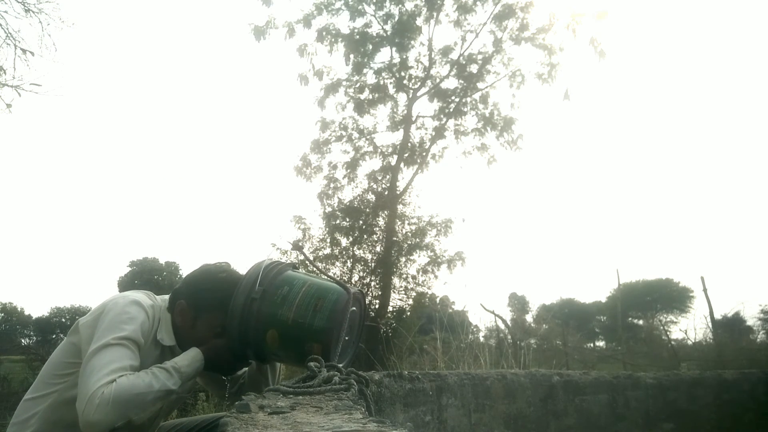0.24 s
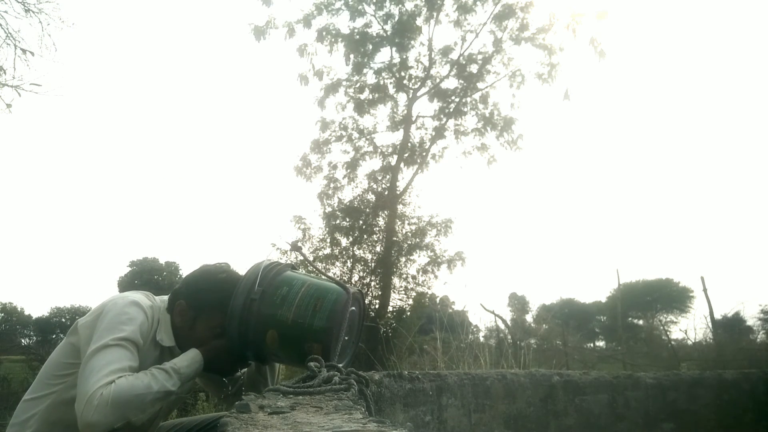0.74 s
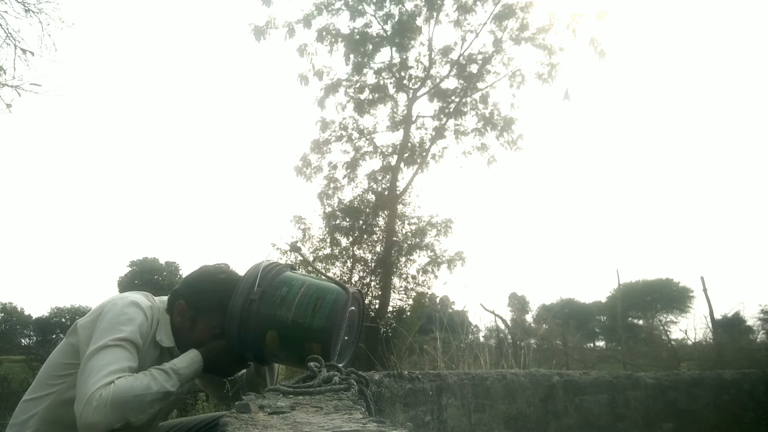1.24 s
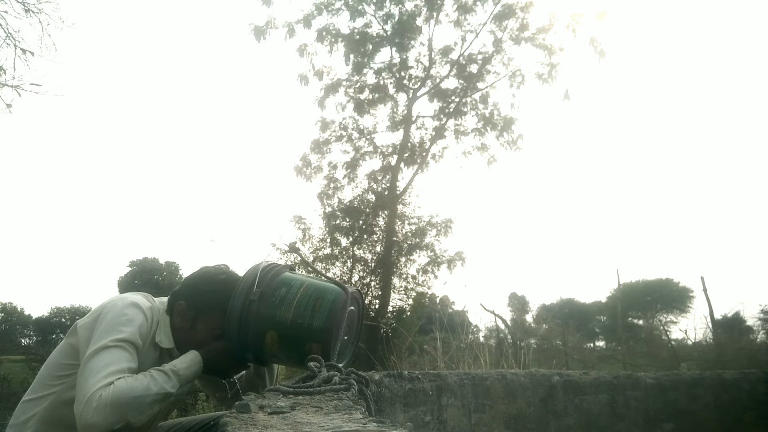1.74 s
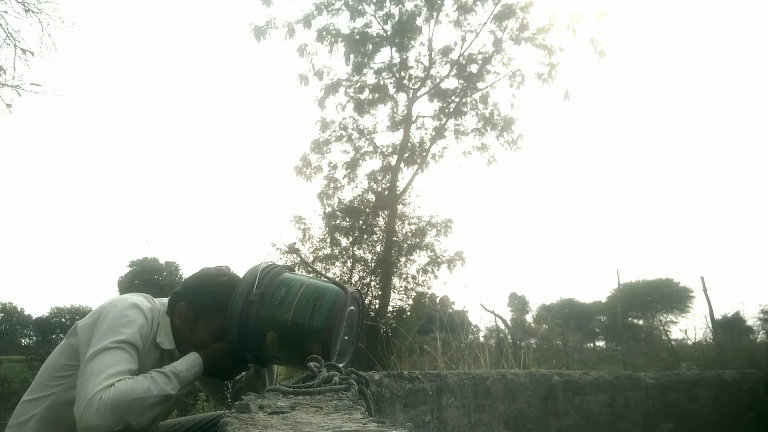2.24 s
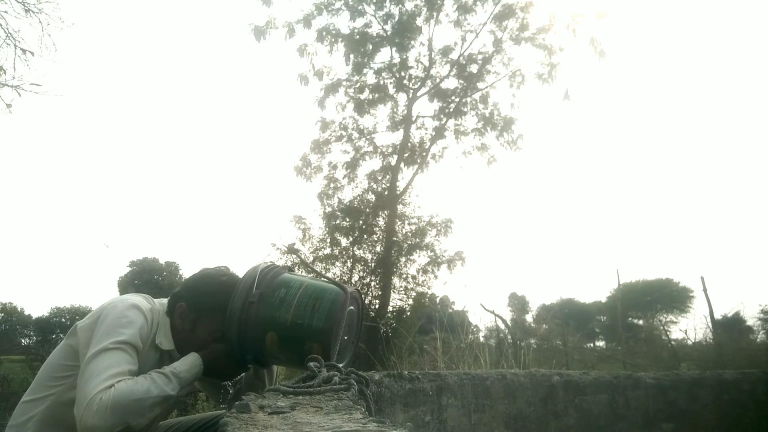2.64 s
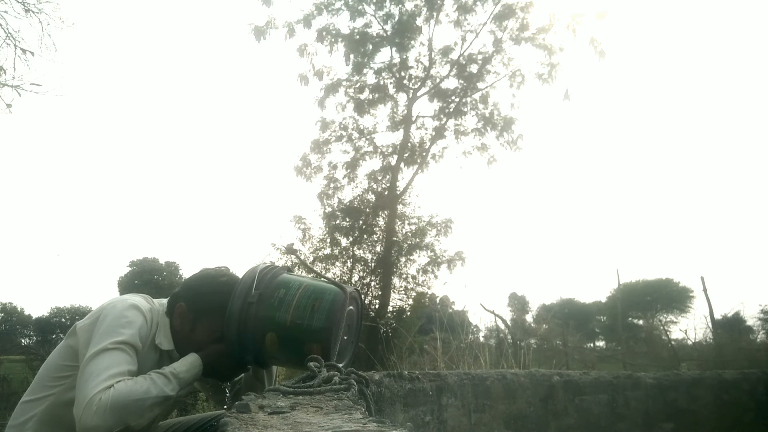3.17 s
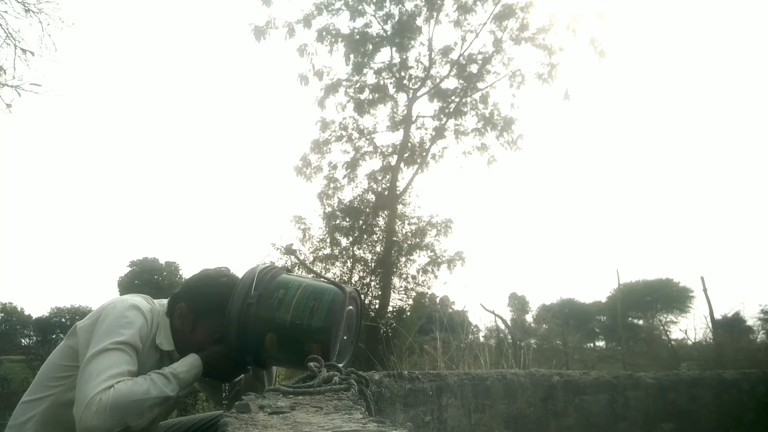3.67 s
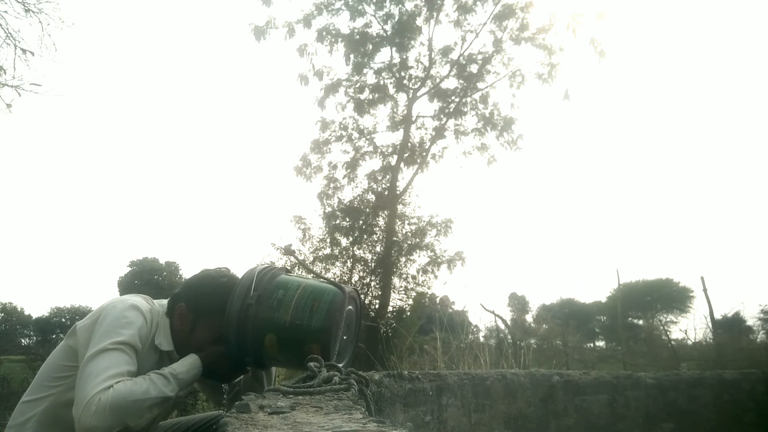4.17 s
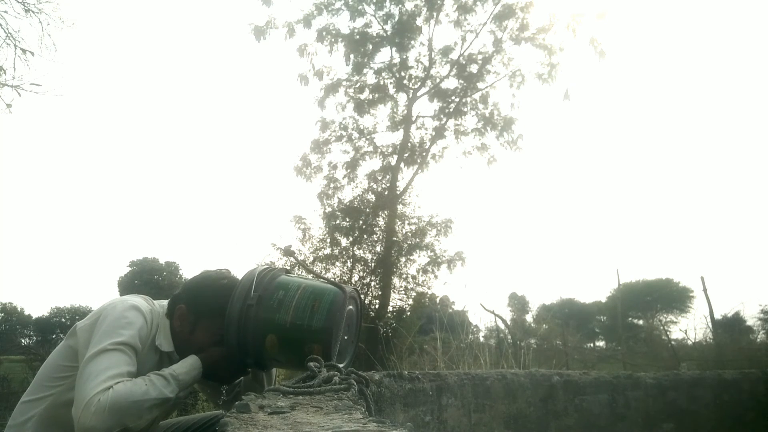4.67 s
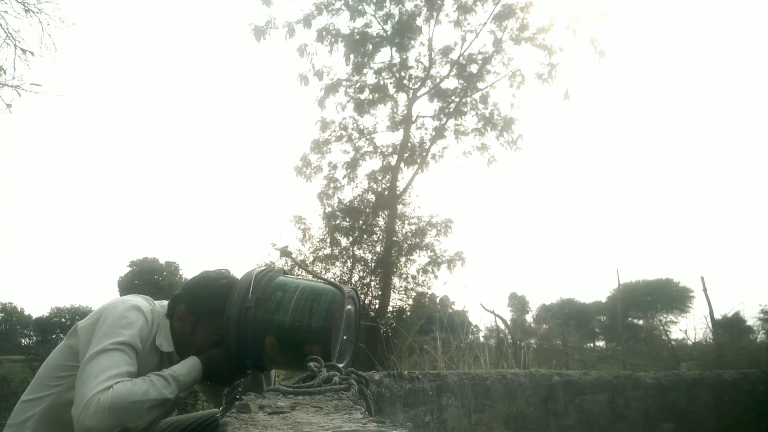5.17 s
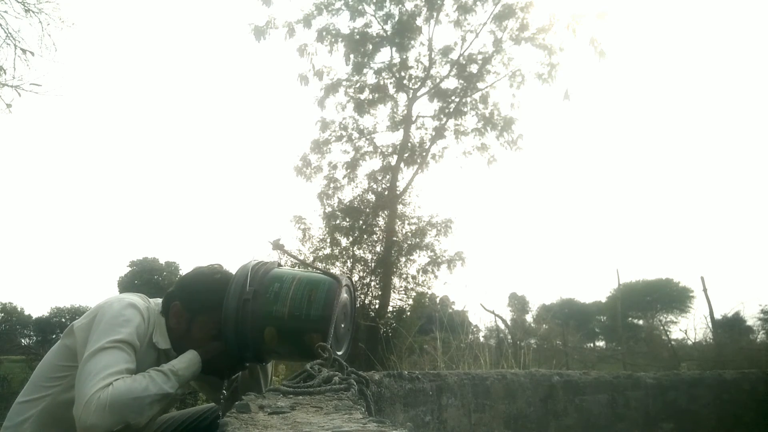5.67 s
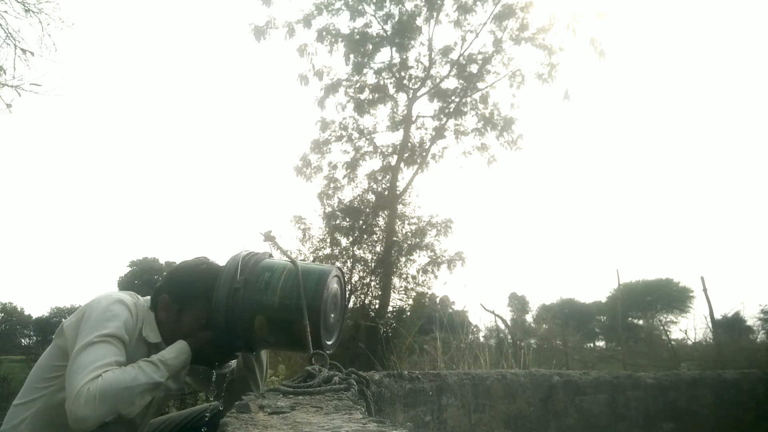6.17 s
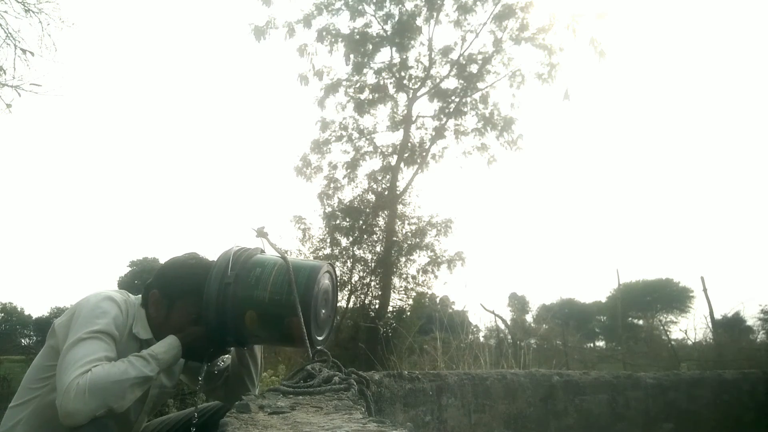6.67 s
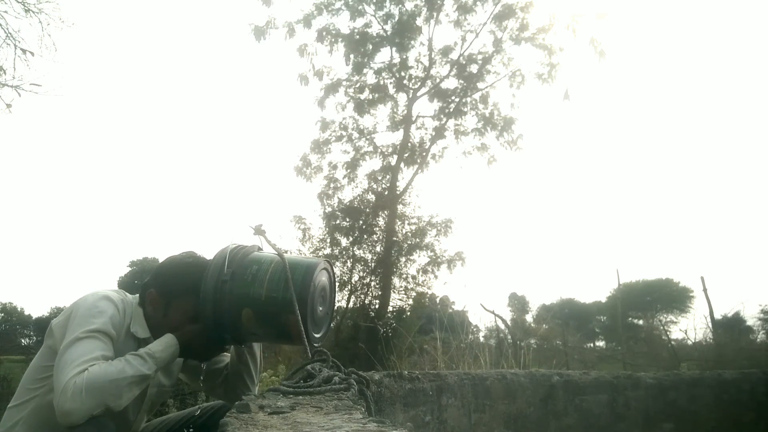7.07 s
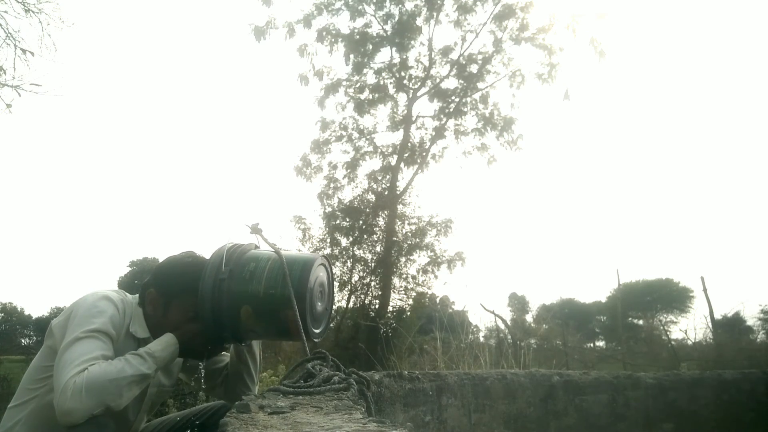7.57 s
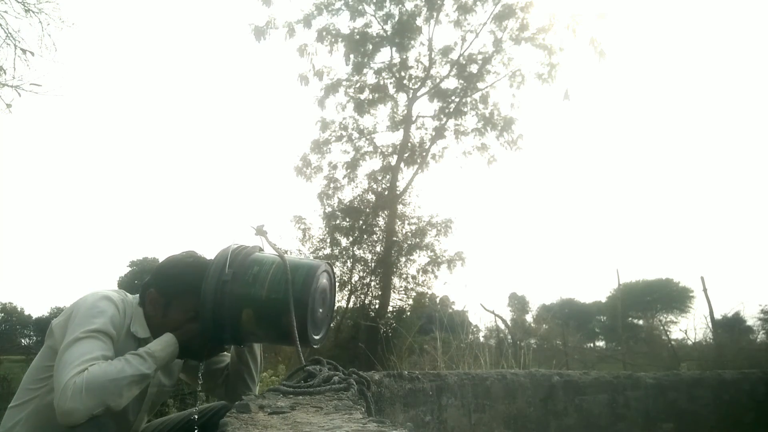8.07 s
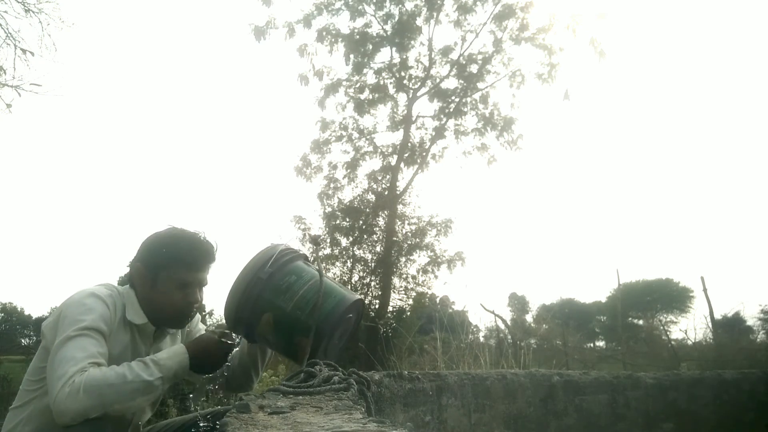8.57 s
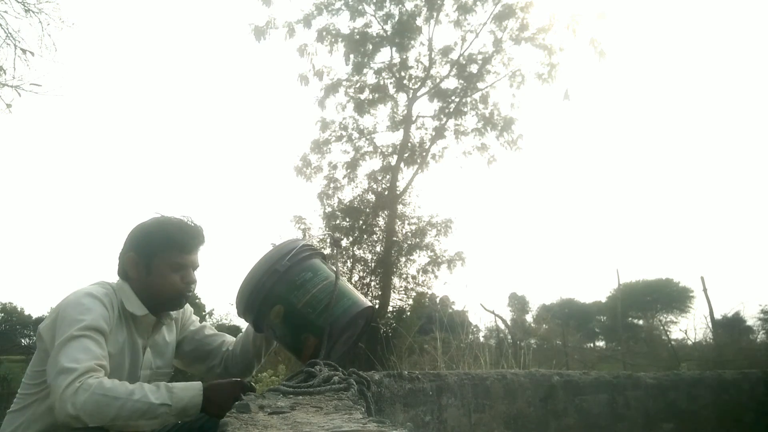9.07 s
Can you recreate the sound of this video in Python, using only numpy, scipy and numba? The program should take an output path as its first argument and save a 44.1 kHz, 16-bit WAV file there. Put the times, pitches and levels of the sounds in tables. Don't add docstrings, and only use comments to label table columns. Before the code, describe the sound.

Close phone pickup beside a stone well, with thin hiss and a background that pumps up and down. Distant motors rumble, crows rasp and small birds whistle in the first half. Reedy lapwing phrases rise, fall and flick upward. After a sharp bucket knock, drops patter and burst on stone, slacken briefly, then splash strongest after a second, duller group of knocks.

```python
import sys
import numpy as np
from scipy import signal
from scipy.fft import rfft, irfft
from scipy.io import wavfile
from scipy.ndimage import uniform_filter1d
from numba import njit

SR = 44100
rng = np.random.default_rng(int(sys.argv[2]) if len(sys.argv) > 2 else 0)


def voltage_ratio(decibels):
    exponent = np.asarray(decibels, float) / 20
    return 10 ** exponent


def put_to_file(sound):
    columns = np.atleast_2d(sound).T
    safe = np.clip(columns, -1, 1)
    whole_steps = np.round(safe * 32767)
    wavfile.write(sys.argv[1], SR, whole_steps.astype(np.int16))


N = 410557

# [t/s,
# peak level/dB, colour f/Hz]
BIG_DROPS = [(4.9612, -50, 10900), (5.026, -50, 8020), (5.1393, -47, 9730), (5.3458, -51, 10100),
             (5.3827, -46, 7290), (5.4042, -49, 5560), (5.5289, -45, 7240), (5.709, -46, 13300),
             (5.7943, -47, 7140), (5.8876, -53, 13500), (5.9205, -48, 8440), (5.9689, -48, 7310),
             (6.2064, -41, 6980), (6.3026, -38, 6840), (6.4129, -40, 6760), (6.4473, -39, 13000),
             (6.5226, -46, 11000), (6.5461, -42, 6500), (6.566, -41, 6720), (6.7401, -47, 11400),
             (6.7636, -46, 12600), (6.8165, -44, 11300), (6.8684, -47, 8310), (6.9322, -36, 9700),
             (6.9547, -42, 11300), (6.9806, -46, 7060), (7.0445, -44, 11200), (7.0634, -40, 10800),
             (7.1058, -45, 10500), (7.1921, -41, 8320), (7.2121, -40, 10100), (7.2774, -45, 8140),
             (7.3533, -49, 6480), (7.3887, -49, 7900), (7.4505, -49, 7830), (7.5139, -49, 6030),
             (7.5648, -43, 6870), (7.7718, -50, 6480), (7.8855, -52, 6300), (8.0078, -37, 7870),
             (8.145, -45, 6680), (8.2173, -43, 7590), (8.2582, -43, 8850), (8.4109, -42, 12200),
             (8.4253, -39, 7980), (8.4488, -47, 7320), (8.4807, -42, 6620), (8.5181, -47, 8120),
             (8.5475, -43, 12200), (8.5959, -48, 7780), (8.7246, -37, 9020), (8.7476, -29, 10400),
             (8.785, -33, 9550), (8.8109, -39, 6900), (8.8394, -39, 7080), (8.8633, -40, 7150),
             (8.8903, -42, 10100), (8.9172, -39, 8560), (9.0404, -48, 6900), (9.1182, -49, 9210)]
# [t/s, level/dB]
FLOW = [(4.6, -65), (5.3, -63), (5.4, -59), (6.15, -57), (6.3, -54), (7.3, -54), (7.58, -58), (7.7, -70.5),
        (7.95, -62), (8.02, -54), (8.68, -58), (8.75, -49), (8.95, -54), (9.28, -65.5)]


def noise():
    return rng.standard_normal(N)


def level(x, db):
    return x * voltage_ratio(db) / np.sqrt(np.mean(x ** 2))


def colour(x, shape):
    hz, db = np.transpose(shape)
    grid = np.maximum(np.arange(N // 2 + 1) * SR / N, 1)
    gain_db = np.interp(np.log(grid), np.log(hz), db, left=-90, right=-90)
    return irfft(rfft(x) * voltage_ratio(gain_db), N)


def walk(rate):
    k = int(SR / rate)
    steps = np.repeat(rng.standard_normal(N // 50), k)[:N + k]
    return 1.244 * uniform_filter1d(uniform_filter1d(steps, k), k)[:N]


def unroll(table, fade=.005):
    s, *columns = np.transpose(table)
    span = slice(max(int(s[0] * SR), 0), min(int(s[-1] * SR), N))
    t = np.arange(span.start, span.stop) / SR
    gate = np.clip(np.minimum(t - s[0], s[-1] - t) / fade, 0, 1)
    return span, gate, [np.interp(t, s, c) for c in columns]


def add(out, s, sound):
    i = int(s * SR)
    out[i:i + len(sound)] += sound[:max(N - i, 0)]


@njit
def svf(x, hz, width):
    y, b, l = np.empty(len(x)), 0., 0.
    for i in range(len(x)):
        g, k = np.tan(np.pi * hz[i] / SR), width / hz[i]
        v = (b + g * (x[i] - l)) / (1 + g * (g + k))
        b, l, y[i] = 2 * v - b, l + 2 * g * v, k * v
    return y


def resonate(x, hz, width):
    return svf(x, np.full(len(x), hz, float), float(width))


def resonate_twice(x, hz, width):
    return resonate(resonate(x, hz, width), hz, width)


def echoes(x, t60, wet_db, gap=.02):
    t = np.arange(SR) / SR
    tail = rng.standard_normal(SR) * voltage_ratio(-60 * t / t60) * (t > gap)
    return x + voltage_ratio(wet_db) * signal.fftconvolve(x, tail / np.sqrt(np.sum(tail ** 2)))[:N]


def drone_db():
    # [t/s, level/dB]
    gated = [(0.0, -48), (0.4, -40.5), (1.4, -44.5), (2.27, -51), (3.2, -59.5), (3.7, -61.5), (4.2, -67.5),
             (4.3, -65), (4.66, -61.5), (4.88, -53), (5.12, -49), (6.2, -53), (7.68, -50), (7.83, -55),
             (8.42, -59), (8.66, -47.5), (9.29, -55)]
    # [crest t/s, closing time/s, lift/dB]
    openings = [(1.6, 0.65, 5.5), (2.42, 0.55, 7), (3.05, 0.12, 8.5), (3.43, 0.14, 9), (3.88, 0.27, 13),
                (4.74, 0.12, 10), (6.37, .35, 4), (8.12, .27, 13), (8.53, .2, 12)]
    t = np.arange(N) / SR
    db = np.interp(t, *np.transpose(gated))
    for s, close, lift_db in openings:
        opening_s = 0.062 + 0.39 * close
        db += np.interp(t, (s - opening_s, s, s + close), (0, lift_db, 0))
    return db


def motors(beat_db=(1.0, 2.5, 1.5), rumble_db=-8):
    # [f/Hz, density/dB per Hz]
    rumble = [(25, -31), (45, 2.5), (110, 3), (170, -7.5), (230, -20.5), (330, -27)]
    # [t/s, f/Hz, level/dB against the drone]
    tones = [
        [(0, 46.5, -4), (2.6, 49.47, -3.5), (5.3, 47.25, -1.5), (8.8, 42.8, -4.5), (9.31, 41.37, -2.5)],
        [(0, 92.45, -3.5), (1.8, 99.56, -2.5), (4.6, 99.7, -7.5), (8, 87.2, -6.5), (9.31, 82.8, -4.5)],
        [(0, 145.3, -10), (2, 149.5, -12), (5, 147.4, -8), (9.31, 140.9, -9.5)],
    ]
    t = np.arange(N) / SR
    out = level(colour(noise(), rumble) * voltage_ratio(1.7 * walk(11)), rumble_db)
    for tone, spread_db in zip(tones, beat_db):
        span, _, (hz, db) = unroll(tone)
        gain = np.sqrt(2) * voltage_ratio(db + spread_db * walk(9)[span])
        out[span] += gain * np.sin(np.cumsum(2 * np.pi * hz / SR))
    for hz, db in ((246, -32.5), (348, -31.0)):
        out += voltage_ratio(db + 1.5 * walk(8)) * np.sin(2 * np.pi * hz * t)
    return out * voltage_ratio(drone_db())


def air(field_share=0.39, hiss_share=0.19):
    # [f/Hz, density/dB per Hz]
    murmur_shape = [(140, -42), (230, -7.5), (734, -8), (1100, -9), (1370, -8), (1530, -8.5), (2370, -10),
                    (6000, -24.5), (7800, -53), (13200, -120)]
    hiss_shape = [(2650, 10.5), (4500, -6), (7610, -2), (12500, -1), (14900, 3.5), (16000, -34)]
    duck_db = uniform_filter1d(drone_db() + 51.5, SR // 6)
    murmur = level(colour(noise(), murmur_shape) * voltage_ratio(1.8 * walk(13)), -68)
    hiss = level(colour(noise(), hiss_shape) * voltage_ratio(0.22 * walk(6.6)), -72.5)
    murmur *= voltage_ratio(field_share * np.minimum(duck_db, 6.5))
    return murmur + hiss * voltage_ratio(hiss_share * np.minimum(duck_db, 2.5))


def swell(s, length, db):
    late = (np.arange(N) / SR - s) / length
    return voltage_ratio(db - 1.5 - 14 * np.maximum(late, -late / .55))


def caw(hz, width, rasp_hz=75, jitter=.35, breathy=0.31, bead_db=2.5):
    chance = rng.standard_normal((2000, 2))
    at = (np.cumsum(np.exp(jitter * chance[:, 0])) * SR / rasp_hz).astype(int)
    pulses = np.zeros(N)
    pulses[at[at < N]] = voltage_ratio(3.1 * chance[at < N, 1])
    rasp = echoes(level(pulses, 0) + breathy * noise(), t60=0.27, wet_db=-0.5, gap=.006)
    return level(resonate_twice(rasp, hz, width) * voltage_ratio(bead_db * walk(45)), 0)


def crows():
    # [crest t/s, length/s, level/dB]
    main_caws = [(.29, .1, -62), (1.15, .2, -53), (1.3, .15, -55), (1.44, 0.12, -57), (1.62, 0.18, -54),
                 (1.84, 0.26, -51), (2.344, 0.17, -55), (2.654, .16, -55), (2.975, 0.36, -49),
                 (3.2, .2, -54), (3.5, 0.43, -55.5), (3.85, 0.3, -64), (4.38, 0.22, -63.5), (4.58, .1, -58),
                 (4.77, 0.15, -53), (5.17, .1, -58), (5.33, 0.12, -60), (6.4, .06, -58), (8.6, .15, -64),
                 (5.74, 0.13, -61)]
    # [crest t/s, length/s, level/dB, f/Hz]
    upper_caws = [(0.526, 0.099, -62.5, 1830), (.95, .06, -64, 1740), (1.06, 0.12, -53, 1950),
                  (1.176, .1, -52, 1835), (1.82, 0.19, -59, 1550), (2.652, 0.13, -64, 1720),
                  (3.162, 0.2, -52, 1750), (3.3, 0.2, -54, 1680), (3.46, .15, -56, 1800),
                  (3.67, 0.14, -60.5, 1605), (3.85, .12, -69, 1675), (4.547, 0.36, -68, 1680)]
    # [crest t/s, length/s, level/dB]
    lower_caws = [(.72, .08, -63), (.8, .08, -63), (.95, .05, -60), (1.28, .08, -59), (.89, .12, -58),
                  (1.2, .15, -53), (2.856, .1, -60.5), (3.04, 0.087, -66), (3.36, 0.25, -62),
                  (3.842, .06, -65)]
    upper_hz = np.interp(np.arange(N) / SR, *np.transpose(upper_caws)[[0, 3]])
    main = caw(1370 * (1 + 0.025 * walk(20)), 150)
    lower = caw(950 * (1 + 0.03 * walk(12)), 130)
    upper = caw(upper_hz * (1 + 0.046 * walk(22.02)), 274, rasp_hz=94.8)
    out = np.zeros(N)
    for voice, caws in ((main, main_caws), (upper, upper_caws), (lower, lower_caws)):
        out += voice * sum(swell(s, length, db) for s, length, db, *_ in caws)
    return out


def beats(rise_s=.006, t60=.045, slide=.03, trim_db=-2.5):
    # [t/s, peak level/dB, f/Hz]
    high_beats = [(1.0127, -46, 1770), (1.0321, -44, 1750), (1.0511, -43, 1950), (1.1184, -42, 1920),
                  (1.1369, -41, 2100), (1.1628, -38, 1390), (1.4731, -45, 1390), (1.5709, -51, 1320),
                  (1.6193, -45, 1250), (1.6373, -43, 1290), (1.766, -45, 1320), (1.8223, -41, 1430),
                  (1.8448, -42, 1390), (1.8857, -47, 1410), (2.0009, -49, 1360), (2.1671, -44, 1800),
                  (2.1905, -46, 1810), (2.3137, -45, 1350), (2.3706, -46, 1360), (2.3931, -47, 1290),
                  (2.5582, -49, 1370), (2.6185, -46, 1290), (2.853, -47, 1350), (2.8879, -42, 1440),
                  (2.9233, -37, 1380), (2.9852, -39, 1390), (3.0451, -40, 1490), (3.1054, -40, 1420),
                  (3.1653, -36, 1390), (3.1848, -40, 1670), (3.2272, -41, 1380), (3.2875, -39, 1670),
                  (3.4092, -43, 1460), (3.511, -41, 1420), (3.5285, -42, 1490), (3.6522, -43, 1480),
                  (3.6721, -46, 1390), (3.7135, -48, 1480), (3.7739, -47, 1390), (4.5611, -50, 1330)]
    low_beats = [(0.781, -56, 961), (0.863, -49, 956), (0.893, -53, 926), (0.926, -53, 947),
                 (1.014, -59, 1040), (1.094, -53, 907), (1.14, -46, 953), (1.169, -48, 1000),
                 (1.257, -52, 934), (1.552, -56, 869), (1.586, -63, 805), (2.084, -54, 1080),
                 (2.411, -60, 810), (2.721, -59, 939), (2.873, -55, 921), (3.012, -56, 931),
                 (3.804, -62, 961), (3.842, -58, 953)]
    out, t = np.zeros(N), np.arange(SR // 10) / SR
    shape = np.minimum(t / rise_s, 1) * voltage_ratio(-60 * np.maximum(t - rise_s, 0) / t60)
    for s, db, hz in list(high_beats) + list(low_beats):
        bend = 1 + slide * rng.standard_normal() * t / .02
        add(out, s - .004, voltage_ratio(db + trim_db) * shape * np.sin(2 * np.pi * hz * t * bend))
    return echoes(out, t60=.2, wet_db=-8, gap=.012)


def whistles(trill_hz=32, throb_db=4.0, waver=0.025):
    # [t/s, length/s, from f/Hz, to f/Hz, level/dB]
    calls = [(1.121, .4, 2400, 2530, -68), (1.14, .1, 2900, 3100, -70), (2.001, 0.27, 2480, 2450, -69),
             (3.79, .11, 2300, 2400, -62), (3.85, .09, 2450, 2600, -62), (2.46, .1, 2650, 2700, -66),
             (2.75, .1, 2520, 2480, -66), (3.861, .09, 2600, 3080, -65), (3.92, .14, 2500, 2600, -65),
             (4.1, .08, 2310, 2375, -68.5), (4.26, 0.12, 1830, 1780, -72), (4.74, .12, 2900, 2400, -62),
             (4.9, 0.099, 2050, 1950, -63), (7.302, 0.092, 2597, 2490, -67.5), (9.089, .1, 2330, 2500, -65)]
    out, throb, drift = np.zeros(N), voltage_ratio(throb_db * walk(70)), 1 + waver * walk(140)
    for s, length, from_hz, to_hz, top_db in calls:
        note = [(s + share * length, from_hz + share * (to_hz - from_hz), top_db + db)
                for share, db in ((0, -4), (0.29, 0), (1, -6))]
        span, gate, (hz, db) = unroll(note, fade=0.0055)
        trill = .3 + .7 * np.sin(np.pi * trill_hz * np.arange(len(hz)) / SR) ** 2
        tone = np.sin(np.cumsum(2 * np.pi * hz * drift[span] / SR))
        out[span] += gate * voltage_ratio(db + 9.0) * trill * throb[span] * tone
    return echoes(out, t60=0.25, wet_db=-4.5)


def pips(throb_db=1.5, waver=.008):
    # [t/s, length/s, from f/Hz, to f/Hz, level/dB]
    glides = [(.114, .022, 2380, 2270, -58), (.146, .02, 2280, 2330, -50), (.174, .02, 2400, 2330, -53),
              (.206, .01, 2300, 2450, -54), (.214, .018, 2400, 2620, -52), (.241, .016, 2650, 2250, -50),
              (.255, .028, 2650, 2900, -61), (.278, .035, 1990, 1740, -55), (.315, .028, 1720, 1620, -59),
              (.35, .014, 1650, 1700, -63), (.338, .022, 2550, 2850, -57), (.362, .02, 2700, 2560, -57),
              (.382, .028, 2850, 2430, -54), (.41, .032, 2680, 2320, -54), (.442, .014, 2350, 2050, -62),
              (.47, .025, 2650, 2400, -64), (.86, .014, 1950, 2000, -62), (.88, .014, 2000, 2100, -63),
              (.945, .035, 2900, 2900, -67), (1.008, .016, 2150, 2050, -57), (1.3, .04, 2750, 2800, -65),
              (4.375, .03, 2150, 2350, -63), (4.6, .06, 1800, 1750, -64), (4.2, .06, 1800, 1880, -64),
              (4.94, .035, 2150, 2250, -60), (5.03, .06, 2350, 2250, -57)]
    out, throb, drift = np.zeros(N), voltage_ratio(throb_db * walk(150)), 1 + waver * walk(200)
    for s, length, from_hz, to_hz, db in glides:
        share = np.linspace(0, 1, int(length * SR))
        hz = (from_hz + share * (to_hz - from_hz)) * drift[int(s * SR):][:len(share)]
        tone = np.sin(np.cumsum(2 * np.pi * hz / SR))
        add(out, s, voltage_ratio(db + 4.5) * np.sin(np.pi * share ** .8) * tone)
    return echoes(out * throb, t60=.25, wet_db=-8, gap=.015)


def bucket():
    # [t/s, peak level/dB, pitch factor, brightness/dB per octave, ring length factor]
    knocks = [
        (4.702, -27.5, 0.99, 2.5, 1.03),
        (4.708, -34.5, 0.98, -2, 0.96),
        (4.734, -33, 1, 3.5, 0.69),
        (8.482, -32, 1.1, -4.5, 1.72),
        (8.512, -32.5, 1.12, -18, 1.4),
        (8.597, -34, 1.32, -4.5, 0.68),
        (8.607, -33, 1.13, -10, 0.77),
    ]
    # [f/Hz, level/dB, t60/s]
    modes = [(130, 2, 0.093), (192.8, -13, 0.33), (254, -8.5, 0.12), (292, -9.5, 0.11), (398, -20, 0.13),
             (630, -22.5, 0.044), (1600, -24, 0.05), (980, -31, 0.05)]
    out, t = np.zeros(N), np.arange(SR // 2) / SR
    for s, db, pitch, bright_db, free in knocks:
        ring = np.zeros(len(t))
        for hz, mode_db, t60 in modes:
            tilt_db = bright_db * np.log2(hz / modes[0][0])
            ring += voltage_ratio(mode_db + tilt_db - 60 * t / (free * t60)) * np.sin(2 * np.pi * hz * pitch * t)
        crack = voltage_ratio(bright_db - 31.5 - 60 * t / 0.062) * rng.standard_normal(len(t))
        add(out, s, voltage_ratio(db + 0.5) * (ring * np.minimum(t / 0.0029, 1) + crack))
    return echoes(out, t60=0.29, wet_db=-5.5, gap=0.0027)


def plops(cycles=70, rise=1.5, click_db=-17):
    # [t/s, peak level/dB, f/Hz]
    gulps = [(1.132, -49, 533), (1.132, -49.5, 710), (1.6172, -52, 2070), (2.085, -52, 1050),
             (2.167, -44, 1776), (3.499, -61, 506), (4.1036, -53.5, 1764), (5.283, -51.5, 740),
             (5.385, -47.5, 1060), (5.4595, -39, 1494), (5.46, -48.5, 820), (6.6413, -48, 2016),
             (7.479, -58, 670), (8.17, -51.5, 471.6), (8.185, -54, 740), (8.21, -56, 850),
             (1.157, -50, 640), (1.19, -54, 530), (5.515, -50, 1450), (8.193, -52, 445),
             (8.7475, -44.5, 2094), (8.8872, -54, 1633), (8.89, -55.5, 1070), (9.069, -47.5, 885)]
    out, t = np.zeros(N), np.arange(SR // 4) / SR
    onset = np.minimum(t / .002, 1)
    for s, db, hz in gulps:
        late, shift = rng.random(2)
        for lag, lag_db, f in ((0, 0, hz), (.022 + .025 * late, -7, hz * (.9 + .2 * shift))):
            bent = 2 * np.pi * f * t * (1 + rise * t)
            pair = np.sin(bent) + .7 * np.sin(1.09 * bent)
            add(out, s + lag, voltage_ratio(db + 1.0 + lag_db - 60 * t * (f + 300) / cycles) * onset * pair)
        slap = resonate(rng.standard_normal(len(t)), 2.2 * hz, 1.5 * hz)
        add(out, s, level(slap, db + click_db) * voltage_ratio(-60 * t / .03))
    return echoes(out, t60=0.2, wet_db=-8, gap=0.012)


def drips():
    # [t/s, peak level/dB, f/Hz]
    fat_drops = [(5.345, -56, 3200), (5.3994, -69, 3800), (5.529, -44.5, 3480), (6.0649, -51.5, 3480),
                 (6.2666, -51, 3410), (6.3021, -48, 3500), (6.4467, -44, 3420), (6.556, -48, 3400),
                 (8.217, -48, 3200), (8.734, -43.5, 3234), (8.7746, -39, 3046), (8.7959, -44, 3460),
                 (8.8626, -45, 3190), (8.8895, -48, 3090), (8.9323, -50, 3440), (8.9999, -50.5, 3557)]
    out, t = np.zeros(N), np.arange(2000) / SR
    for s, db, hz in fat_drops:
        ring = voltage_ratio(-60 * t / .022) * np.sin(2 * np.pi * hz * t * (1 + 5 * t))
        splat = resonate(resonate(rng.standard_normal(2000), 0.88 * hz, 2200), hz, 1600)
        splat = level(splat, -9.0) * voltage_ratio(-60 * t / 0.042)
        add(out, s, voltage_ratio(db + 1.0) * np.minimum(t / 0.001, 1) * (ring + splat))
    return echoes(out, t60=0.26, wet_db=-6.5, gap=0.0015)


def burst(tint_hz=0, t60=.02, broad_db=0):
    t = np.arange(1600) / SR
    hz = tint_hz or 5000 * 2 ** (1.45 * rng.random())
    broad, tint = rng.standard_normal((2, 1600))
    hiss = voltage_ratio(broad_db + 2.2 * rng.standard_normal()) * resonate_twice(broad, 10500, 21000)
    crackle = level(resonate_twice(tint, hz, 2000), -4)
    fade = voltage_ratio(-60 * np.maximum(t - 0.002, 0) / t60 - 3.0)
    return (hiss + crackle) * np.minimum(t / 0.0035, 1) ** 1.5 * fade


def trickle(gap_s=.024, jitter=.6, mean_db=-55, spread_db=3.5, growth=1.2):
    chance = rng.standard_normal((300, 2))
    s = FLOW[0][0] + np.cumsum(gap_s * np.exp(jitter * chance[:, 0]))
    flow_db = np.interp(s, *np.transpose(FLOW)) - np.mean(FLOW, axis=0)[1]
    db = growth * flow_db + mean_db + spread_db * chance[:, 1]
    clear = np.abs(s[:, None] - np.transpose(BIG_DROPS)[0]).min(axis=1) > .012
    return np.c_[s, db][clear & (s < FLOW[-1][0])].tolist()


def splatter(spray_db=-6, count=1500):
    # [t/s, peak level/dB]
    strays = [(1.5204, -52), (1.9629, -49.5), (2.2842, -53), (2.9871, -49), (3.3, -53), (3.45, -55),
              (3.7843, -50.5), (3.9986, -48), (4.62, -51)]
    out = np.zeros(N)
    for s, db, *hz in list(BIG_DROPS) + list(strays):
        add(out, s - .0015, voltage_ratio(db + (1.0 if hz else -2.5)) * burst(*hz, t60=0.019, broad_db=-1.5))
        add(out, s + 0.0034 + 0.0073 * rng.random(), voltage_ratio(db + spray_db) * burst(t60=0.015, broad_db=-8))
        add(out, s - 0.012 + 0.016 * rng.random(), voltage_ratio(db + 1.8 * spray_db) * burst(t60=0.025, broad_db=-8))
    for s, db in trickle():
        add(out, s, voltage_ratio(db) * burst(t60=0.016, broad_db=-3.0))
    for s in rng.uniform(FLOW[0][0], FLOW[-1][0], count):
        db = np.interp(s, *np.transpose(FLOW)) - 2.0 + 2.8 * min(rng.exponential(), 3)
        add(out, s, voltage_ratio(db) * burst(t60=0.014, broad_db=-13.0))
    return echoes(out, t60=0.45, wet_db=-25, gap=.003)


def arch(s, length, crest, hz, db, start_hz=2530, droop_s=.016):
    hold = length - droop_s - crest
    sag_hz, sag_db = hz - 950 * hold, db - 25 * hold
    return -20.5, [(s, start_hz, db - 17.5),
                   (s + .35 * crest, start_hz + .55 * (hz - start_hz), db - 5),
                   (s + crest, hz, db),
                   (s + crest + hold, sag_hz, sag_db),
                   (s + length, sag_hz - 170, sag_db - 9)]


def chip(s, length, hz, db):
    return -11.5, [(s, hz, db - 5), (s + 0.41 * length, hz, db), (s + length, hz - 420, db - 10.5)]


def fall(s, length, from_hz, floor_hz, db, slide_hz_per_s=4700, floor_s=.042, round_s=.02):
    land, end, attacked = s + length - floor_s, s + length, s + .4 * length
    leave = max(land - (from_hz - floor_hz) / slide_hz_per_s, s)
    times = np.unique([s, attacked, leave, land - round_s, land + round_s, end])
    hz = np.interp(times, (leave, land - round_s, land + round_s, end),
                   (from_hz, floor_hz + slide_hz_per_s * round_s / 2, floor_hz, floor_hz + 60))
    return -23, np.c_[times, hz, db + np.interp(times, (s, attacked), (-10, 0))]


def flick(s, length, from_hz, top_hz, db):
    return -44, [(s, from_hz, db), (s + .68 * length, top_hz, db), (s + length, top_hz, db - 9)]


def lapwing(flutter_db=2.2, stutter_hz=77):
    # [t/s, length/s, crest after the start/s, second partial at the crest f/Hz, level/dB]
    arches = [(2.201, .255, .1, 2665, -48), (2.569, .172, .06, 2625, -49.5),
              (4.449, .204, 0.084, 2695, -55), (4.748, .14, .072, 2743, -44.5),
              (6.175, 0.25, .17, 2765, -40.5), (6.52, .164, .12, 2834, -38),
              (7.936, 0.23, .195, 2670, -39.5), (9.23, .08, .035, 2640, -58)]
    # [t/s, length/s, f/Hz, level/dB]
    chips = [(4.377, 0.041, 2520, -57.5), (7.77, 0.041, 2578, -47)]
    # [t/s, length/s, from f/Hz, floor f/Hz, level/dB]
    falls = [(2.858, 0.1, 2300, 2004, -57.5), (4.997, .12, 2440, 2093, -51), (6.765, .147, 2620, 2064, -47),
             (8.255, .24, 2600, 2110, -48.5)]
    # [t/s, length/s, from f/Hz, top f/Hz, level/dB]
    flicks = [(2.946, 0.077, 2390, 2895, -61), (5.12, 0.058, 2600, 3034, -58),
              (6.91, 0.06, 2413, 3147, -49.5), (8.495, .052, 2347, 2950, -45)]
    # [from t/s, to t/s]
    stutters = [(6.515, 6.562), (7.93, 7.975), (8.255, 8.325), (6.765, 6.8)]
    # [f/Hz, level/dB]
    throat = [(1000, -36), (1270, -13), (1340, -10), (1375, -15), (1430, -17), (1470, -3), (1570, -1)]
    # [partial number, level/dB against the third]
    overtones = [(3, 1.5), (4, -4), (5, -5), (6, -9.5), (7, -20), (8, -26)]
    # [t/s, level/dB]
    facing = [(2.7, -6), (4.4, 0), (8.6, 0), (9.2, -10)]
    out, t = np.zeros(N), np.arange(N) / SR
    hoarse = sum((t > start) & (t < end) for start, end in stutters)
    unsteady = 1 + walk(700) * (.006 + .03 * hoarse)
    notes = []
    for rule, rows in ((arch, arches), (chip, chips), (fall, falls), (flick, flicks)):
        notes += [rule(*row) for row in rows]
    for open_db, note in notes:
        span, gate, (second_hz, second_db) = unroll(note, fade=.003)
        crest_db = second_db.max()
        third_db = open_db + .6 * second_db + .4 * crest_db + np.interp(t[span], *np.transpose(facing))
        third_db -= 0.2 * np.maximum(2450 - second_hz, 0)
        first_db = second_db + .7 * (second_db - crest_db)
        first_db += np.interp(second_hz / 2, *np.transpose(throat))
        shut_db = .9 * np.minimum(third_db - second_db + 20, 0)
        phase = np.cumsum(np.pi * second_hz * unsteady[span] / SR)
        voice = voltage_ratio(first_db) * np.sin(phase) + voltage_ratio(second_db) * np.sin(2 * phase)
        for k, db in overtones:
            voice += voltage_ratio(third_db + db + (k - 3.5) * shut_db) * np.sin(k * phase)
        out[span] += np.sqrt(2) * gate * voice
    for start, end in stutters:
        catch = np.clip(1.3 + 1.6 * np.cos(2 * np.pi * stutter_hz * (end - t)), .05, 1.3)
        out *= np.where((t > start) & (t < end), catch, 1)
    return echoes(out * voltage_ratio(flutter_db * walk(60)), t60=0.4, wet_db=-7.5)


def scene():
    background = motors() + air() + crows() + beats() + whistles() + pips()
    water = plops() + drips() + splatter()
    return (background + bucket() + water + lapwing())[None]


def band_limit(x):
    return signal.sosfilt(signal.butter(12, 16270, fs=SR, output="sos"), x)


def record(dry):
    top_cut = signal.ellip(8, .2, 60, 15750, fs=SR, output="sos")
    mix = signal.sosfilt(top_cut, dry)
    return band_limit(mix)


dry = scene()
out = record(dry)
put_to_file(out)
```